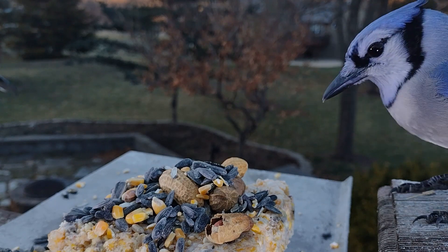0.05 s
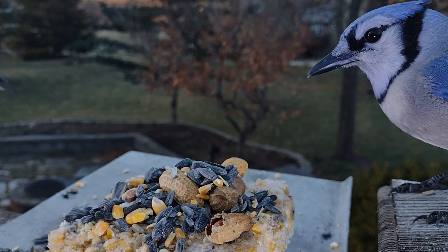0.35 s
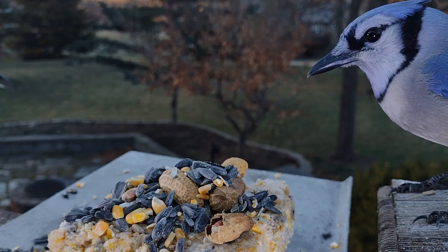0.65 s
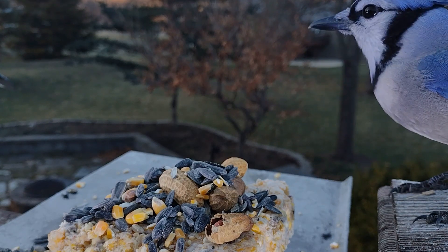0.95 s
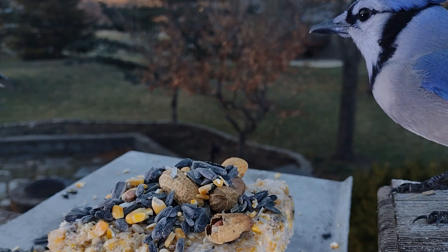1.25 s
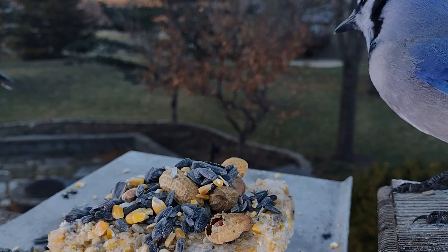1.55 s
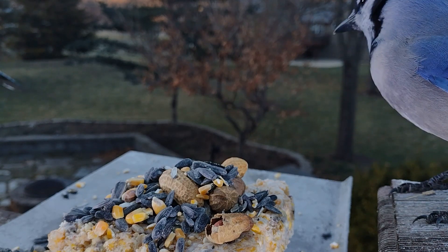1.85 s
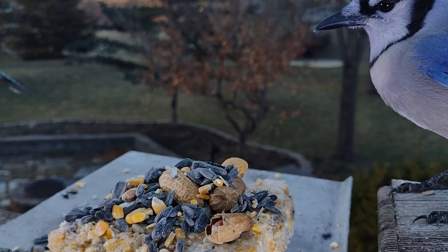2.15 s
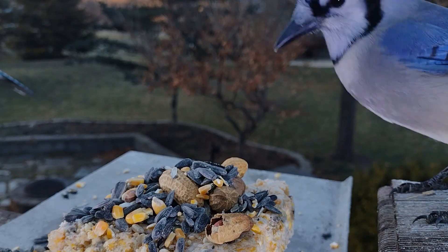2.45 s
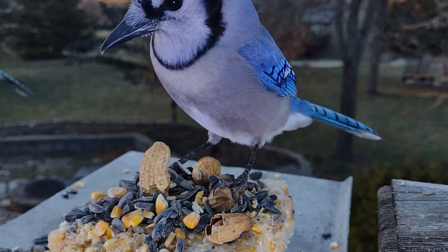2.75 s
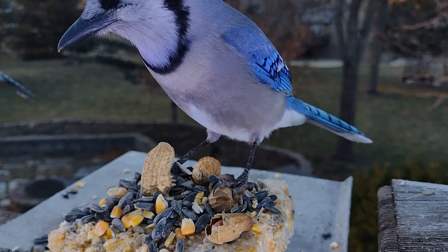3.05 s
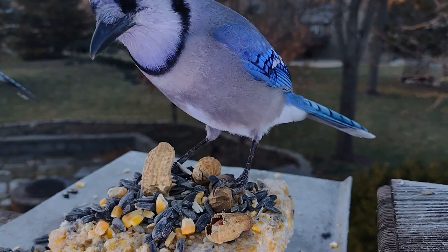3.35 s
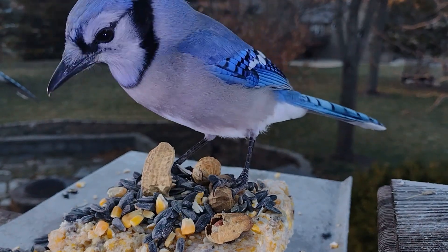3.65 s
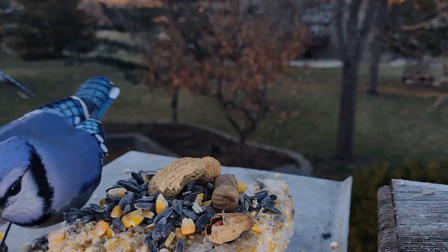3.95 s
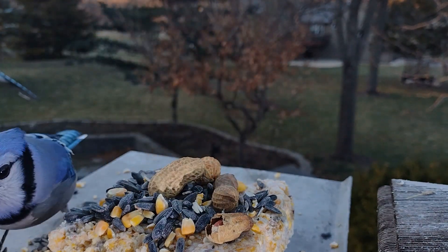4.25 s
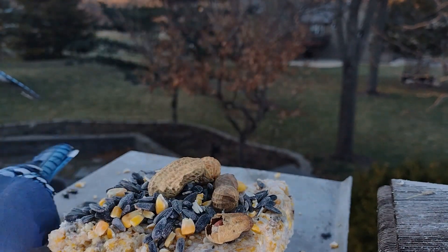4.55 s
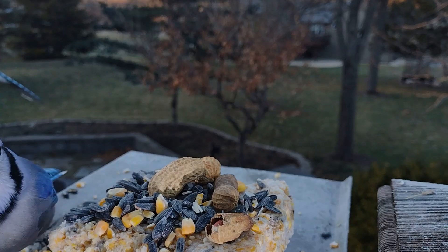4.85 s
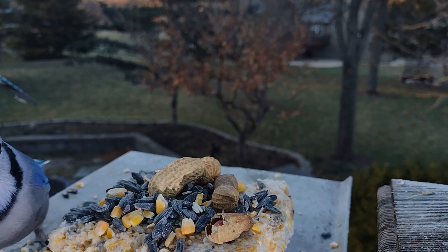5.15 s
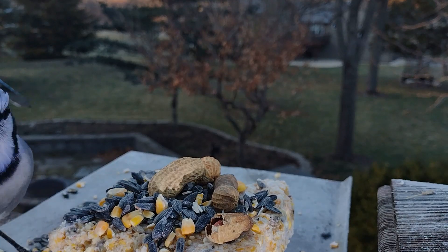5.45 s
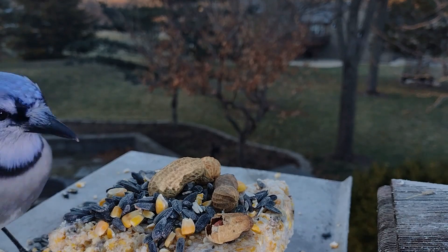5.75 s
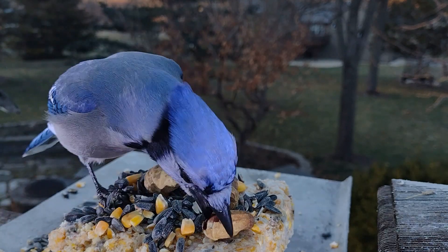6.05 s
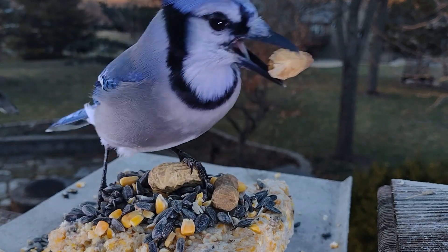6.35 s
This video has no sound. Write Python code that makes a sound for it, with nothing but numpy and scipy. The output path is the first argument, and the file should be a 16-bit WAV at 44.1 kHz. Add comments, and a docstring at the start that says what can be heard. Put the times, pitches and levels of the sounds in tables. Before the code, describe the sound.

In a quiet backyard, small birds whistle and chirp faintly over distant traffic and a low machine hum. Then a jay hops onto a metal feeder tray right by the microphone: seed husks crunch, claws tap and wings puff softly. Past the middle come a few light thumps and one very sharp, loud strike on the metal, then a lesser one. More seed rustles and snaps near the end, with a brief wing beat.

```python
"""A jay hops about on a metal feeder tray heaped with seed, very close and almost dry.
Its bill and claws send sharp bending waves through the sheet and set it ringing; husks crunch,
snap and slide underfoot, landings boom in the tray, and its wings push soft puffs of air.
Small birds whistle, buzz and squeal far off in the echoing yard, each note a gliding, shaking sine.
Behind them lie distant traffic, a low machine hum and a faint hiss."""
import sys
import numpy as np
from scipy import signal
from scipy.fft import rfft, irfft, next_fast_len
from scipy.io import wavfile
from scipy.ndimage import uniform_filter1d

SR = 44100
rng = np.random.default_rng(int(sys.argv[2]) if len(sys.argv) > 2 else 0)


def file_out(sig):
    """Save sig as 16-bit WAV at sys.argv[1]."""
    # one column per channel
    cols = np.atleast_2d(sig).T
    # limit, then scale
    lim = np.clip(cols, -1, 1)
    pcm = np.round(lim * 32767).astype(np.int16)
    wavfile.write(sys.argv[1], SR, pcm)


N = 290619
TIME = np.arange(N) / SR

# Levels are in dB; steps, shuffles, birds, tyres and hum are trimmed further down.
# Hard strikes on the tray. Each row: start in seconds, level in dB, resonance in Hz, its Q, treble
# cutoff in Hz, travel time at 4 kHz in ms, ring against attack in dB, lag of the left side in ms.
PECKS = [(2.9638, -41, 2350, 1.2, 4500, 0.703, 26, 0.13), (2.993, -47, 2310, 2.1, 3800, 0.71, 14, 0.11),
         (3.0781, -41.5, 1700, 3, 4000, 0.7, 6, 0.12), (4.4505, -44, 640, 3.6, 1800, 0.77, 2, 0.1),
         (4.4905, -43.5, 1010, 12, 1988, 0.7, 7, 0.097), (4.6054, -28, 4380, 9.8, 8350, 0.91, -6, 0.08),
         (4.6394, -10.5, 5660, 1.2, 12310, 2.6, -11.5, 0.062),
         (4.909, -30, 2610, 1.24, 6840, 1.67, -13.5, 0.017), (6.299, -52, 4260, 5.7, 8150, 1, -21, 0.033),
         (6.345, -37, 1410, 4.3, 4340, 0.68, -3, 0.18)]
# The tray's modes. Each row: pitch in Hz, level in dB, time to fall 60 dB in seconds.
TRAY_MODES = [(338, -4.5, 0.13), (632, -7.5, 0.14), (865, -6.5, 0.17), (1013, -4, 0.13), (1165, -4, 0.17),
              (1357, 1, 0.1), (1478, 0, 0.088), (1622, -0.5, 0.068), (1780, -3, 0.13), (2270, -6.5, .07),
              (2450, 1, 0.047), (2695, -6, .08), (3110, -4, 0.091), (4345, -9, 0.037), (4600, -2, 0.032),
              (5530, 0.5, 0.049), (6100, -10.5, 0.041), (6700, -7, 0.056), (8700, -7, .07), (9620, -9, .08),
              (11800, -0.5, 0.07)]
# How well the sheet radiates. Each row: frequency in Hz, gain in dB.
SHEET_EQ = [(3500, 1.5), (4600, 6.5), (5400, -0.5), (6700, 3), (7900, -0.5), (8600, 0), (9500, 1.5),
            (10400, 4.5), (11500, -3), (13000, -3.5), (15500, -3)]
# Left and right hear the tray from different angles. Each row: frequency in Hz, share of the left boost.
LEFT_SHADE = [(1000, 0.97), (3000, 0.41), (6000, 0.053), (12000, -0.57)]
# Claws and bill in the seed. Each row: start in seconds, crunch level in dB, knock level in dB,
# treble tilt of the crunch in dB per octave.
STEPS = [(2.641, -61, -67, 0), (2.648, -49.5, -58, 2), (2.7029, -49.5, -58, 0), (2.756, -48, -65, 1),
         (2.784, -60, -64, -5), (2.915, -47.5, -60, -1.5), (2.957, -31, -53, 2), (2.962, -30, -46.5, 2.5),
         (2.9886, -36.5, -46, 0.5), (3.003, -54, -48, -11), (3.042, -54, -51.5, -14),
         (3.0743, -29.5, -46, -6), (3.1159, -53.5, -58, 2), (3.212, -70, -58, -8), (3.982, -40, -50.5, 7),
         (3.9944, -36, -44, 2), (4.009, -44, -48, 7), (4.0444, -47, -55, 3), (4.072, -47.5, -56, 5),
         (4.091, -52, -52.5, -1), (4.1896, -55, -54.5, -3), (4.4499, -34.5, -46.5, 2),
         (4.4867, -35, -46, 4), (4.603, -42.5, -37.5, 14), (4.646, -30, -46.5, 5), (4.6651, -38, -52, 1),
         (5.2904, -42.5, -53, -5), (5.3247, -44, -48.5, 4.5), (5.346, -56, -54.5, 0),
         (5.9543, -52, -71.5, -1), (6.2964, -55, -50, -1), (6.3463, -57, -43.5, -3),
         (6.3942, -37.5, -50.5, 7), (6.509, -43.5, -57.5, 2)]
# Tone of crushed husks and of the knock under them. Each row: frequency in Hz, gain in dB.
HUSK_EQ = [(300, -16), (1000, -14.5), (2500, 1.5), (4500, 0), (7500, 2.5), (10500, -2.5), (15500, -13)]
KNOCK_EQ = [(150, -15.5), (400, -3.5), (650, 1), (1000, -1), (1500, -5.5), (2200, 0), (3300, -4),
            (6000, -19.5), (15000, -48.5)]
# The bird's weight landing. Each row: start in seconds, level in dB, pitch in Hz, 60 dB decay in seconds.
THUMPS = [(4.452, -51, 608, .1), (4.487, -51.5, 1019, .06), (4.488, -52.5, 484.6, .06),
          (4.508, -50, 345, 0.14), (4.523, -55.5, 900, .1), (4.544, -45.5, 185, 0.049),
          (4.556, -53.5, 291, .12), (6.349, -52, 322, .1)]
# Single husks that crack or drop. Each row: start in seconds, level in dB, pitch in Hz.
SNAPS = [(2.657, -55, 8400), (2.677, -53, 7000), (2.709, -57, 10000), (2.742, -60, 13000),
         (2.7565, -53.5, 7900), (2.784, -59, 5000), (2.809, -63, 12000), (2.95, -52, 7500),
         (3.884, -68, 9000), (3.927, -70, 7500), (3.952, -66, 4960), (4.119, -59, 6940),
         (4.6245, -50, 7010), (5.431, -55.5, 2960), (5.451, -60, 3000), (5.9941, -57.5, 4500),
         (6.017, -60, 7400), (6.1068, -58.5, 7500), (6.122, -53, 3500), (6.1445, -62, 5990),
         (6.4725, -64, 6000), (6.5044, -59, 7850), (6.54, -54, 5000), (6.559, -53, 4200)]
# Seed slides, then wing strokes. Each row: start in seconds, length in seconds, level in dB.
SHUFFLES = [(2.642, 0.225, -62), (3.176, 0.1, -73.5), (3.785, 0.45, -74.5), (3.974, 0.19, -63),
            (5.3, 0.088, -63.5), (5.957, 0.3, -66.5), (6.392, 0.025, -52), (6.429, 0.1, -67.5),
            (6.498, 0.089, -57)]
WING_STROKES = [(2.971, 0.21, -54.5), (3.97, 0.16, -53.5), (4.484, 0.075, -49.5), (6.35, 0.051, -49.5)]
# Tone of loose seed and of feathers. Each row: frequency in Hz, gain in dB.
LOOSE_SEED_EQ = [(1000, 10), (3200, 2.5), (4400, 8.5), (5800, -11), (7300, 3.5), (9500, -2.5), (15000, 4)]
FEATHER_EQ = [(60, -20.5), (180, 2.5), (350, 2), (650, -3), (1200, -7.5), (3000, -18.5), (12000, -40.5)]

# The main singer's syllables. Each: length in seconds, start, middle and end pitch in Hz, roughness
# (the share by which the pitch shakes). WHISTLE and AFTER_NOTE count their pitches from the arch's top.
SLUR = (.068, 2260, 2150, 2110, .022)
WHISTLE = (.092, -110, 0, -130, .005)
AFTER_NOTE = (.03, 0, -70, -190, .005)
# Runs of repeated slurs. Each row: start in seconds, end in seconds, level in dB.
SLUR_RUNS = [(0.095, .42, -77.5)]
# Arched whistles, each with a falling after-note. Each row: start in seconds, level in dB, top in Hz.
WHISTLES = [(.655, -79.5, 2335), (.84, -75.5, 2424), (1.045, -70.5, 2414), (1.238, -71, 2450),
            (1.432, -72, 2450), (3.315, -81, 2420), (3.51, -79, 2430), (3.695, -78.5, 2416),
            (3.885, -79, 2380), (4.08, -80, 2440)]
# Another bird's rasps: an upward flick, then two sliding voices. Each row: start in seconds, level in dB.
RASPS = [(.612, -75.5), (.868, -74)]
# The notes of one rasp. Each row: delay in seconds, level in dB, then a syllable as above.
RASP_NOTES = [(0.002, -3, 0.025, 2620, 3050, 3700, .015), (0.014, -6, .085, 3690, 3620, 3440, 0.018),
              (.015, -1, 0.08, 2820, 2900, 2870, 0.03), (.04, -5, .055, 3400, 3326, 3150, .03),
              (0.054, -1, .04, 2650, 2560, 2450, 0.06)]
# Raspy squeals. Each row: start in seconds, level in dB, length in seconds, start, middle and end
# pitch in Hz, level of the octave against the note in dB.
SQUEALS = [(4.257, -72, .04, 2280, 2600, 2820, -10), (4.3, -68, 0.038, 2940, 2840, 3430, -8),
           (4.337, -70.5, .018, 3380, 4120, 4500, -26), (4.457, -64, .04, 2290, 2800, 3080, -7),
           (4.495, -64.5, .032, 3200, 2910, 3245, -2.5), (4.524, -69.5, .018, 3260, 3900, 4410, -20.5),
           (4.671, -69, .03, 2800, 3050, 3180, -9.5), (4.705, -68, 0.033, 3180, 3300, 4000, -15),
           (4.731, -70, 0.016, 3780, 4200, 5100, -24.5), (4.859, -70, 0.043, 2345, 3285, 4010, -5),
           (4.921, -68.5, 0.029, 3390, 3380, 4050, -4), (4.946, -69, 0.017, 3870, 4440, 5270, -26)]
# Thin sagging pipings, hoarse buzzes, high level peeps and quick rising chirps.
# Each row: start in seconds, length in seconds, level in dB, middle pitch in Hz.
PIPINGS = [(0.329, 0.1, -85, 3216), (0.47, 0.091, -89, 3210), (0.781, 0.13, -85, 3300),
           (0.876, 0.049, -84, 3620), (0.912, 0.07, -82, 3340), (1.351, 0.11, -89.5, 3340),
           (1.53, 0.088, -83, 3060), (2.094, 0.19, -93, 3320), (2.26, 0.12, -89, 3050),
           (3.4, 0.11, -85, 3360), (3.53, 0.15, -86, 3190), (4.92, .04, -72.5, 6940),
           (6.07, 0.032, -67.5, 3810)]
BUZZES = [(0, 0.027, -71, 4190), (0.074, 0.082, -83, 4200), (0.148, 0.18, -91, 4090),
          (0, 0.11, -83.5, 7400), (3.279, 0.26, -83.5, 7300), (3.643, 0.17, -84.5, 4120),
          (4.107, 0.074, -75.5, 3880), (4.512, 0.12, -71, 8430), (4.699, 0.067, -74.5, 7660),
          (4.312, .03, -76, 6770), (5.776, 0.085, -81, 3700), (5.818, 0.082, -77, 4210),
          (5.992, 0.12, -81, 7030), (6.432, 0.12, -81, 7350)]
PEEPS = [(1.075, .035, -89, 8550), (1.14, 0.051, -90, 8320), (1.215, .04, -89, 8050),
         (1.375, 0.037, -94, 5200), (1.482, .05, -91, 5200), (1.565, 0.054, -93, 5120)]
CHIRPS = [(0.048, 0.047, -79, 3690), (1.435, 0.034, -76, 7200), (1.822, .03, -97, 4500),
          (2.44, 0.026, -90, 4900), (2.604, 0.017, -68.5, 6930), (4.843, 0.022, -76, 6500),
          (6.548, 0.0098, -59, 7330)]
# Calls with two voices at once. Each row: start in seconds, length in seconds, level in dB.
TWO_TONES = [(5.19, 0.035, -71.5), (5.505, .03, -72.5)]

# Tone of the yard's echoes, the far roads and the microphone hiss. Each row: frequency in Hz, gain in dB.
YARD_EQ = [(100, -1.0), (4000, 2.5), (8000, -4.5), (15000, -15.0)]
TRAFFIC_EQ = [(20, -28), (45, -19), (65, -11.5), (82, 1.5), (120, -3), (160, -2.5), (250, -3), (400, -9.5),
              (850, -10.5), (1300, -18.5), (2000, -28.5), (3200, -41), (6000, -75.5), (15000, -75)]
HISS_EQ = [(500, 8.5), (4000, 6), (7000, 3), (11000, 3), (15500, -2)]
# The traffic's slow swell. Each row: time in seconds, rumble level in dB, tyre level in dB.
TRAFFIC_SWELL = [(0, -57, -58), (1.2, -58.5, -57.5), (3.4, -63, -60), (4.201, -55.5, -59.5),
                 (5.2, -56.5, -61), (6.5, -53.5, -59)]
# The hum fades and comes back a little. Each row: time in seconds, level in dB.
HUM_FADER = [(0, -50), (1.4, -50), (2.6, -55.5), (3.399, -55), (5.002, -60.5), (5.499, -61), (5.9, -52),
             (6.5, -58)]
# Weaker engine tones. Each row: pitch in Hz, level in dB, width in Hz.
ENGINE_TONES = [(79.2, -74, 8.9), (107.9, -64, 5), (186, -68.5, 6.3), (229, -64, 11)]
# Stereo image of the open air. Each row: frequency in Hz, left-right likeness (1 is mono).
AIR_LIKENESS = [(30, 0.98), (130, 0.95), (250, 0.81), (400, 0.61), (700, 0), (1200, 0), (3000, 0.037),
                (15000, 0.54)]


def pecks(rim_db=-9, rim_s=.0012, ring_floor_db=-9, shade_db=2):
    """A hard strike crosses the sheet as a bending wave: treble first, then a rim echo, then the ring."""
    out, size = np.zeros((2, N)), 2 ** 14
    hz = np.fft.rfftfreq(size, 1 / SR) + 1
    left_gain = amp(shade_db * read(LEFT_SHADE, hz))
    lag_share = 1 / np.sqrt(1 + (hz / 7500) ** 4)  # the left side lags less in the treble
    rim_echo = 1 + amp(rim_db) * np.exp(-2j * np.pi * hz * rim_s * np.array([[1], [.8]]))
    bass_cut = hz / (hz + 700)
    for s, db, centre_hz, q, top_hz, travel_ms, ring_db, lag_ms in PECKS:
        contact = 1 / np.sqrt(1 + (hz / top_hz) ** 8)
        body = resonance(hz, centre_hz, q)
        body /= np.sqrt(1 + (0.8 * centre_hz / hz) ** 8)  # the sheet radiates little below resonance
        bend = np.exp(-4j * np.pi * travel_ms / 1000 * np.sqrt(hz * 4000))
        left = left_gain * np.exp(-2j * np.pi * hz * lag_ms / 1000 * lag_share)
        wave = contact * bend * np.array([left, np.ones(len(hz))]) * amp(read(SHEET_EQ, hz))
        attack = unit(irfft(wave * (body + amp(-17) * bass_cut) * rim_echo))
        ring_tone = (abs(body) + amp(ring_floor_db)) * bass_cut
        ring = unit(irfft(wave * ring_tone * rfft(tray_ring(), size)))
        add(out, s, at_level(attack + amp(ring_db) * ring, db, window=128)[:, :SR // 4])
    return out


def tray_ring(rattle_db=8, rattle_t60=0.06, detune=.015, place_db=3.5):
    """Clear modes over a dense rattle; the bird's weight detunes them, the spot struck rebalances them."""
    t = np.arange(SR // 4) / SR
    ring = amp(rattle_db - 60 * t / rattle_t60) * rng.standard_normal((2, len(t)))
    for hz, db, t60 in TRAY_MODES:
        load, place = rng.uniform(-1.1, 1, 2)
        phase = rng.random() + 0.44 * rng.standard_normal((2, 1))
        mode = np.sin(2 * np.pi * (hz * (1 + detune * load) * t + phase))
        ring += amp(db + place_db * place - 60 * t / t60) * mode
    return ring


def steps(crunch_trim_db=-8, knock_trim_db=-3, rise_s=0.00037, settle_t60=0.052):
    """A claw crushes a few husks in a burst of clicks and knocks the tray under them."""
    out, t = np.zeros((2, N)), np.arange(SR // 4) / SR
    onset = 1 - np.exp(-t / rise_s)
    press = onset * amp(-60 * t / settle_t60)
    for s, crunch_db, knock_db, tilt_db in STEPS:
        crunch = husks(grains(len(t), per_s=8100, spread_db=0.92) * press, tilt_db)
        knock = colour(tray_ring(rattle_db=5.5, rattle_t60=0.13) * onset, KNOCK_EQ)
        add(out, s, at_level(crunch, crunch_db + crunch_trim_db))
        add(out, s, at_level(knock, knock_db + knock_trim_db))
    return out


def grains(n, per_s, spread_db):
    """Tiny husk clicks of uneven size, each with its own strength left and right."""
    strength = amp(spread_db * np.minimum(rng.exponential(1, n), 3))
    hits = rng.random(n) < per_s / SR
    return unit(strength * hits * rng.standard_normal((2, n)))


def husks(clicks, tilt_db=0, t60=0.0048, ring_db=-14):
    """Each click rings very briefly among the shells around it."""
    t = np.arange(SR // 50) / SR
    ring = amp(ring_db - 60 * t / t60) * rng.standard_normal((2, len(t)))
    ring[:, 0] = 1  # the dry click
    return colour(signal.oaconvolve(clicks, ring, axes=1)[:, :clicks.shape[1]], HUSK_EQ, tilt_db)


def thumps(rise_cycles=0.56):
    """A soft foot loads the tray gradually and rings one low resonance of tray and post."""
    out, t = np.zeros((2, N)), np.arange(SR // 4) / SR
    for s, db, hz, t60 in THUMPS:
        envelope = (1 - np.exp(-hz * t / rise_cycles)) * amp(-60 * t / t60)
        boom = np.sin(2 * np.pi * hz * t) * envelope
        add(out, s, at_level(np.array([boom, boom]), db))
    return out


def snaps(t60=0.015, q=2.2):
    """One husk cracks: a very short burst of noise around its own pitch."""
    out, t = np.zeros((2, N)), np.arange(2048) / SR
    hz = np.fft.rfftfreq(len(t), 1 / SR) + 1
    for s, db, centre_hz in SNAPS:
        burst = rng.standard_normal((2, len(t))) * amp(-60 * t / t60)
        crack = irfft(rfft(burst) * resonance(hz, centre_hz, q))
        add(out, s, at_level(crack, db, window=128))
    return out


def shuffles(trim_db=2, clump_db=3, fade_s=0.0098, sag_db=-10):
    """Loose seed rustles in clumps as the bird shifts its weight; each slide starts fast and sags."""
    level = np.zeros(N)
    for s, length, db in SHUFFLES:
        fades = np.clip((TIME - s) / fade_s, 0, 1) * np.clip((s + length - TIME) / fade_s, 0, 1)
        level += amp(db + sag_db * np.clip((TIME - s) / length, 0, 1)) * fades
    clumps = amp(clump_db * np.tanh(drift(N, 62)))
    trickle = husks(shell_ticks(), t60=0.073, ring_db=-20)
    return amp(trim_db) * level * unit(clumps * colour(trickle, LOOSE_SEED_EQ))


def shell_ticks(per_s=2000, sizes=24, low_hz=1940, high_hz=14900, decay_cycles=2.4):
    """Shells of many sizes rub and tick, each size at its own pitch."""
    out, t = np.zeros((2, N)), np.arange(SR // 100) / SR
    for hz in np.linspace(low_hz, high_hz, sizes):
        tick = unit(np.sin(2 * np.pi * hz * t) * np.exp(-hz * t / decay_cycles))
        out += signal.oaconvolve(grains(N, per_s / sizes, spread_db=0.5), tick[None], axes=1)[:, :N]
    return out


def wings():
    """Feathers push soft puffs of air as the bird hops."""
    out = np.zeros((2, N))
    for s, length, db in WING_STROKES:
        n = int(length * SR)
        puff = unit(colour(air(SR // 2), FEATHER_EQ))[:, :n]
        add(out, s, amp(db) * puff * np.sin(np.pi * np.arange(n) / n))
    return out


def songbird(notes, trim_db=-3):
    """Each note is a sine gliding through three pitches; hoarse notes shake fast in pitch and level."""
    out = np.zeros((2, N))
    for s, db, length, *pitches, rough in notes:
        progress = np.linspace(0, 1, int(length * SR))
        glide = np.polyval(np.polyfit([0, .5, 1], pitches, 2), progress)
        shake_rate = max(400, 3 * rough * pitches[1])  # a wider shake is faster, and blurs into a rasp
        hz = glide * (1 + rough * drift(len(progress), shake_rate))
        turns = np.cumsum(hz) / SR + rng.uniform(-0.042, 0.11, (2, 1))
        swell = np.sqrt(abs(np.sin(np.pi * progress)))
        flutter = amp(100 * rough * drift(len(progress), 100))
        add(out, s, amp(db + trim_db) * unit(np.sin(2 * np.pi * turns) * swell * flutter))
    return out


def song_notes(slur_every_s=.087, after_s=.105, after_db=-2):
    """The main singer's slurs and whistles, and another bird's harsh rasps, note by note."""
    for start, end, db in SLUR_RUNS:
        for s in np.arange(start, end, slur_every_s):
            yield s, db, *SLUR
    for s, db, top_hz in WHISTLES:
        for delay, note_db, (length, *bend, rough) in [(0, 0, WHISTLE), (after_s, after_db, AFTER_NOTE)]:
            yield s + delay, db + note_db, length, *(top_hz + np.array(bend)), rough
    for s, db in RASPS:
        for delay, note_db, *syllable in RASP_NOTES:
            yield s + delay, db + note_db, *syllable


def squeal_notes(rough=.045):
    """A slightly nearer bird's rough, rising notes, each doubled at the octave."""
    for s, db, length, *pitches, octave_db in SQUEALS:
        yield s, db, length, *pitches, rough
        yield s, db + octave_db, length, *(2 * np.array(pitches)), rough


def chatter_notes(sag_per_s=0.19, two_tone_hz=(1850, 2570), chirp_rise_hz=1200):
    """Small calls of birds further off; the last number of each note is its roughness."""
    for s, length, db, hz in PIPINGS:
        sag = hz * sag_per_s * length / 2
        yield s, db, length, hz + sag, hz, hz - sag, .013
    for s, length, db, hz in BUZZES:
        yield s, db, length, hz, hz, hz, .07
    for s, length, db in TWO_TONES:
        for hz in two_tone_hz:
            yield s, db, length, hz, hz, hz, .045
    for s, length, db, hz in PEEPS:
        yield s, db, length, hz, hz, hz, .012
    for s, length, db, hz in CHIRPS:
        yield s, db, length, hz - chirp_rise_hz / 2, hz, hz + chirp_rise_hz / 2, .038


def yard_echoes(send, t60, predelay_s=0.014, per_s=2000):
    """Trees, fence and house wall scatter the sound back with a softened top."""
    t = np.arange(SR) / SR
    taps = rng.standard_normal((2, SR)) * (rng.random((2, SR)) < per_s / SR)
    taps = colour(taps * (t > predelay_s) * amp(-60 * t / t60), YARD_EQ)
    return signal.fftconvolve(send, taps / np.linalg.norm(taps[0]), axes=1)[:, :N]


def traffic(split_hz=150, tyre_trim_db=1):
    """Far roads: engine rumble and tyre noise swell separately."""
    s, rumble_db, tyre_db = np.transpose(TRAFFIC_SWELL)
    noise = colour(air(N), TRAFFIC_EQ)
    def filtered(hz, kind):
        return signal.sosfiltfilt(signal.butter(3, hz, kind, fs=SR, output="sos"), noise)
    low = filtered(split_hz, "low")
    rumble = low / filtered([42, 130], "band").std()
    tyres = (noise - low) / filtered([350, 1900], "band").std()
    rumble *= amp(np.interp(TIME, s, rumble_db))
    tyres *= amp(np.interp(TIME, s, tyre_db) + tyre_trim_db)
    return rumble + tyres


def machine_hum(hz=133, trim_db=-1.5, waver=0.013, throb_db=1.5):
    """A distant machine drones on one wavering tone, among weaker, blurred engine tones."""
    s, db = np.transpose(HUM_FADER)
    turns = np.cumsum(hz * (1 + waver * drift(N, 12.3))) / SR
    level = amp(np.interp(TIME, s, db) + trim_db + throb_db * drift(N, 26))
    out = unit(np.sin(2 * np.pi * turns)) * level
    for tone_hz, tone_db, width_hz in ENGINE_TONES:
        angle = 2 * np.pi * tone_hz * TIME
        out += amp(tone_db) * unit(drift(N, width_hz) * np.cos(angle) + drift(N, width_hz) * np.sin(angle))
    return out


def hiss(db=-77):
    """The microphone's own faint, steady noise."""
    return amp(db) * unit(colour(rng.standard_normal((2, N)), HISS_EQ))


def air(n):
    """Noise from all round: nearly mono in the bass, wide in the mids, narrower again at the top."""
    size = next_fast_len(n)
    mid, side = rfft(rng.standard_normal((2, size)))
    likeness = read(AIR_LIKENESS, np.fft.rfftfreq(size, 1 / SR))
    mid, side = mid * np.sqrt(1 + likeness), side * np.sqrt(1 - likeness)
    return irfft(np.array([mid + side, mid - side]), size)[:, :n]


def drift(n, rate):
    """A smooth random wobble of about rms 1, changing up to roughly rate times a second."""
    hz = np.fft.rfftfreq(8 * SR, 1 / SR)[:12000]
    spectrum = rng.standard_normal((len(hz), 2)) @ [1, 1j]
    wobble = unit(irfft(spectrum * np.exp(-(hz / rate) ** 2)))
    return np.interp(np.arange(n) / SR, np.arange(len(wobble)) / len(wobble) / hz[1], wobble)


def resonance(hz, centre_hz, q):
    """The band-pass response of one resonance."""
    return 1 / (1 + 1j * q * (hz / centre_hz - centre_hz / hz))


def colour(x, eq, tilt_db=0):
    """Applies an EQ curve, tilted above 3 kHz by tilt_db per octave."""
    size = next_fast_len(x.shape[-1] + 512)
    hz = np.fft.rfftfreq(size, 1 / SR)
    octaves = np.log2(np.maximum(hz, 3000) / 3000)
    return irfft(rfft(x, size) * amp(read(eq, hz) + tilt_db * octaves), size)[..., :x.shape[-1]]


def read(curve, hz):
    """Reads a curve on a log-frequency axis."""
    points_hz, values = np.transpose(curve)
    return np.interp(np.log(hz + 1), np.log(points_hz + 1), values)


def at_level(x, db, window=256):
    """Sets the rms of a short sound's loudest window of samples."""
    power = uniform_filter1d((x ** 2).mean(0), window, mode="constant")
    return amp(db) * x / np.sqrt(power.max() + 1e-20)


def amp(db):
    """Decibels to gain."""
    return 10 ** (np.asarray(db) / 20)


def unit(x):
    """Scales to rms 1."""
    return x / np.sqrt(np.mean(x ** 2) + 1e-20)


def add(mix, s, sound):
    """Mixes a stereo sound in at s seconds."""
    part = mix[:, max(round(s * SR), 0):][:, :sound.shape[1]]
    part += sound[:, :part.shape[1]]


def scene():
    """The feeder up front and almost dry, the songbirds far and wet, over a bed of traffic and hum."""
    feeder = pecks() + steps() + thumps() + snaps() + shuffles() + wings()
    singers, others, squealer = songbird(song_notes()), songbird(chatter_notes()), songbird(squeal_notes())
    birds = amp(6) * singers + amp(2.5) * (others + squealer)
    echoes = yard_echoes(amp(-34.5) * feeder + amp(-4) * singers + amp(-0.5) * others, t60=0.42)
    echoes += yard_echoes(amp(3.5) * squealer, t60=0.36, predelay_s=0.0027)
    return feeder + birds + echoes + traffic() + hiss() + machine_hum()


def record(dry):
    """A steep low-pass takes off the very top of the mix."""
    low_pass = signal.firwin(511, cutoff=15950, window=("kaiser", 9), fs=SR)
    return signal.oaconvolve(dry, low_pass[None], "same")


dry = scene()
out = record(dry)
file_out(out)
```